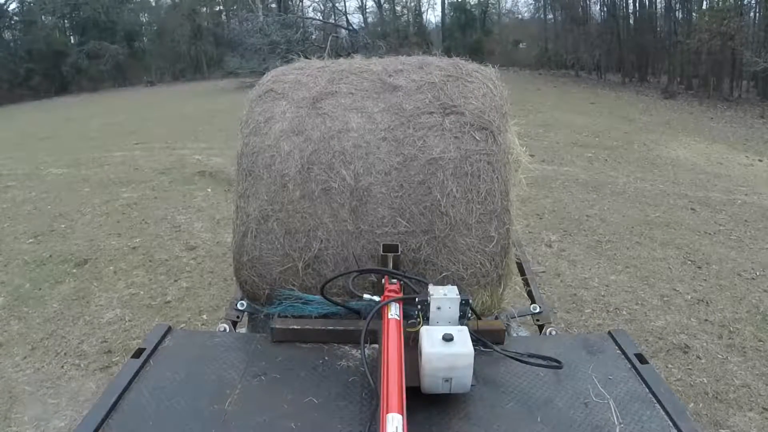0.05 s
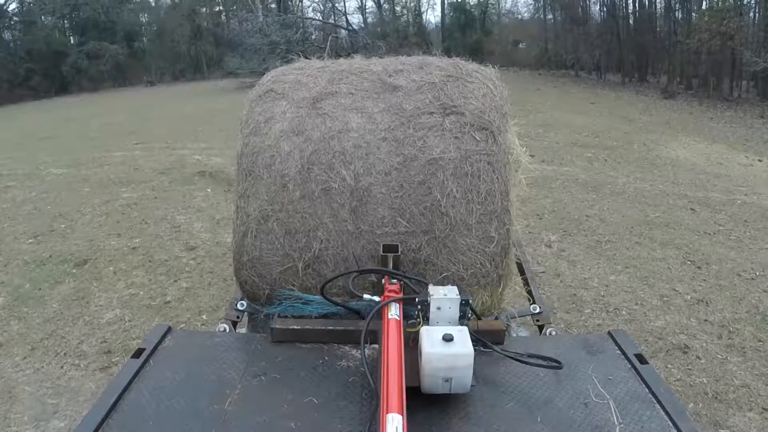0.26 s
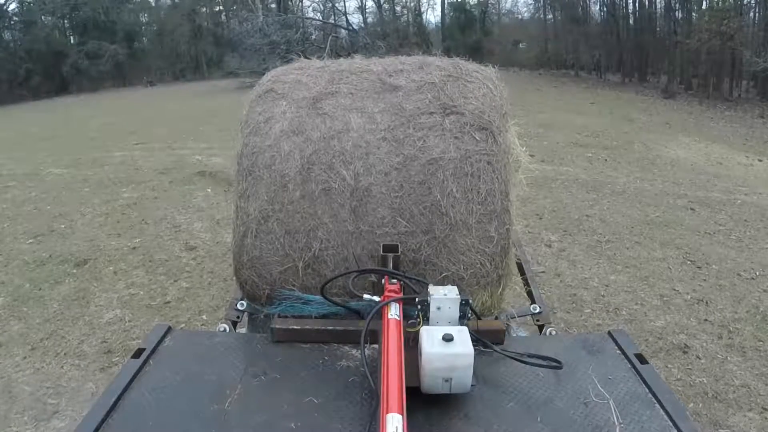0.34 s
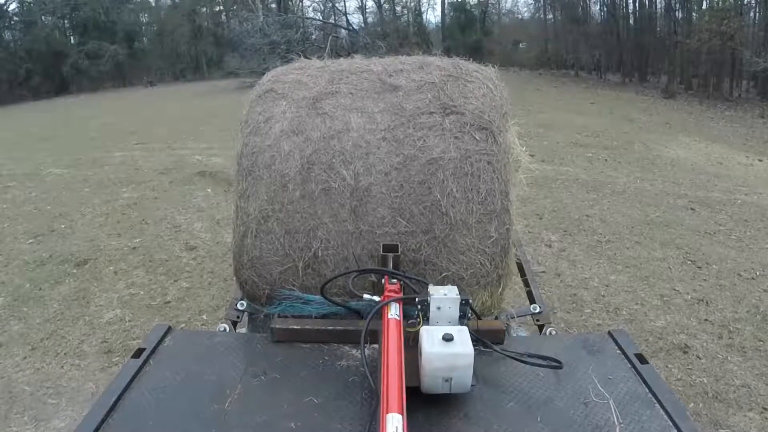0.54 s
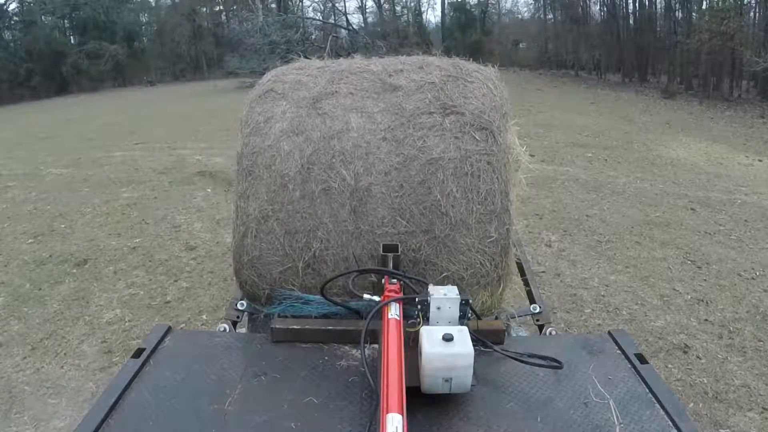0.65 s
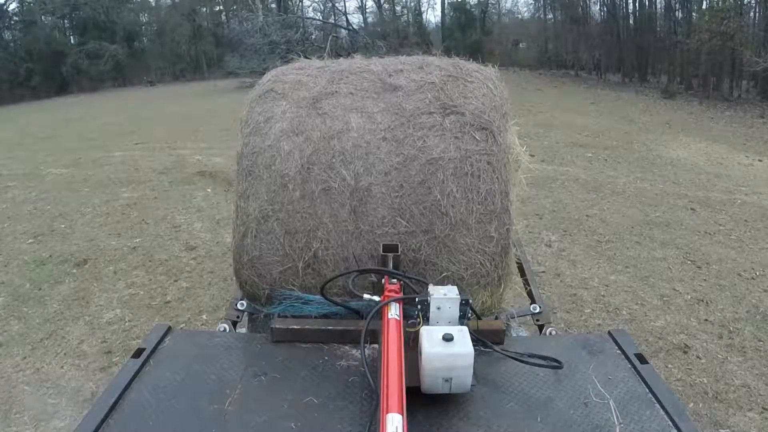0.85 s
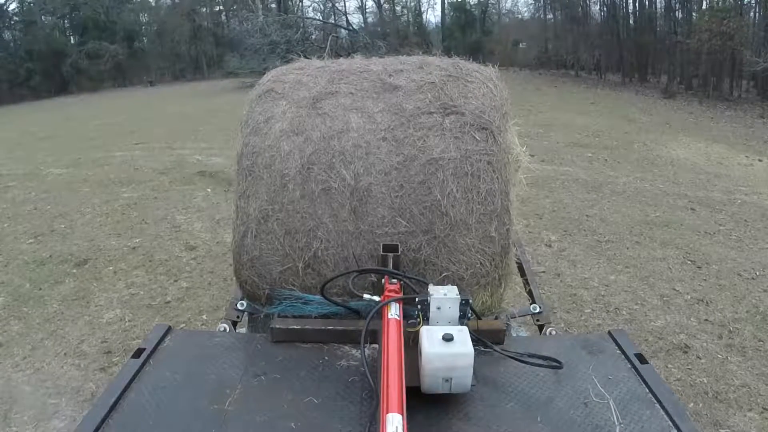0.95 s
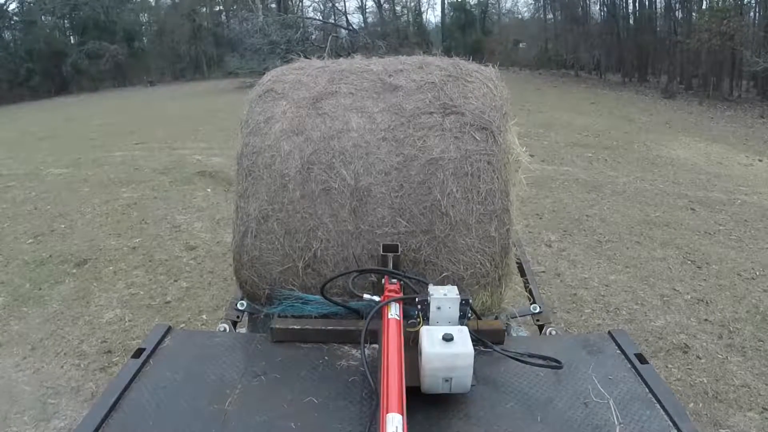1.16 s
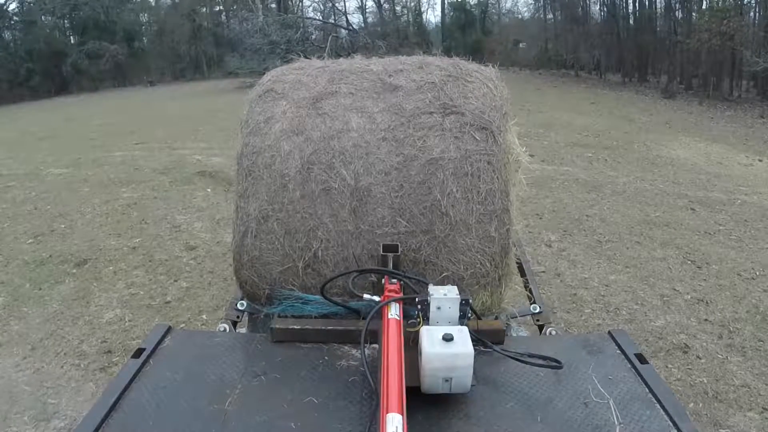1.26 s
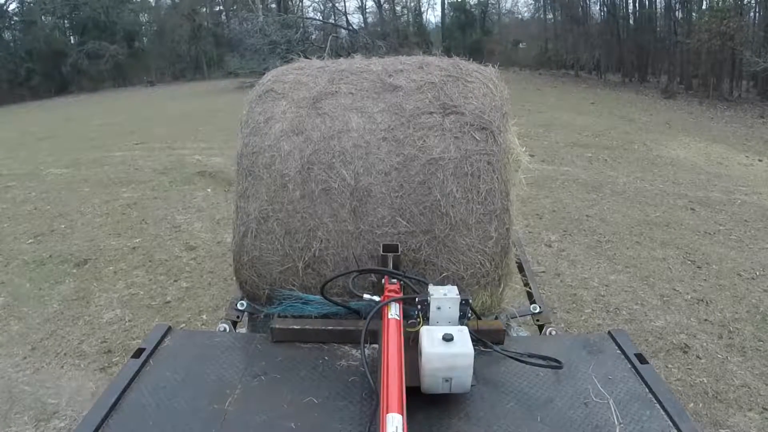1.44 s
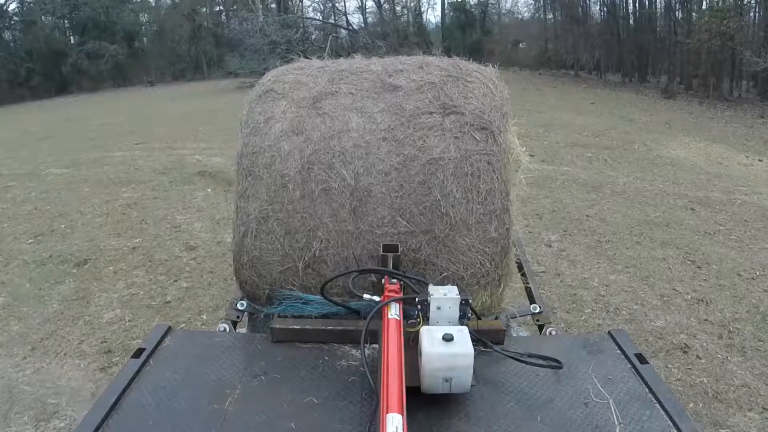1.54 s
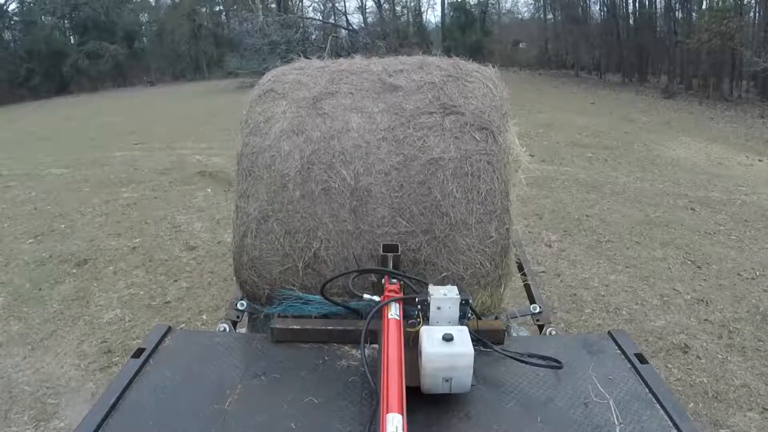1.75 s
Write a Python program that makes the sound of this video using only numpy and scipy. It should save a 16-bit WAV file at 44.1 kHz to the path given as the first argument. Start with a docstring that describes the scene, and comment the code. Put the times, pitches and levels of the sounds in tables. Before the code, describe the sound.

A steel lift clunks and rattles as a flatbed truck creeps across a field, and the deck booms under the bouncing load. Low rumble, soft hiss and faint hay crackle continue at a microphone above the bed.

```python
"""A low rumble, soft hiss and a faint high whine: a flatbed truck creeps over a field with a round hay
bale on its rear spear, heard from one microphone above the bed. Almost at once the steel lift clunks and
rattles, each contact ringing its frame. A loose part rubs and clangs softly, jolts thud in the body
panels and the deck booms as the load bounces. Dry stalks crackle faintly while the truck rolls on."""
import sys
import numpy as np
from scipy import signal
from scipy.fft import rfft, irfft, next_fast_len
from scipy.io import wavfile
from scipy.ndimage import map_coordinates

SR = 44100
rng = np.random.default_rng(int(sys.argv[2]) if len(sys.argv) > 2 else 0)


def materialize(psi):
    """Save the field psi as 16-bit PCM at rate SR to the path in sys.argv[1].

    A 1-D psi becomes a single channel; in a 2-D psi each row is a channel.
    """
    bounded = np.clip(np.atleast_2d(psi).T, -1, 1)
    quanta = np.round(bounded * 32767).astype(np.int16)
    wavfile.write(sys.argv[1], SR, quanta)


N = 79380
TIME = np.arange(N) / SR


def amp(db):
    return 10 ** (np.asarray(db) / 20)


def unit_rms(x):
    return x / np.sqrt(np.mean(x ** 2) + 1e-20)


def along(points, hz):
    """Read (Hz, value) points on a log frequency axis."""
    knots_hz, values = np.transpose(points)
    return np.interp(np.log(hz + 1), np.log(knots_hz + 1), values)


def wobble(rate):
    """A smooth random curve, rate knots a second."""
    return map_coordinates(rng.standard_normal(int(N * rate / SR) + 4), [TIME * rate])


def tone(hz, wander_rad, rate):
    """A sine of rms 1 whose phase wanders, rate knots a second."""
    return unit_rms(np.sin(2 * np.pi * hz * TIME + wander_rad * wobble(rate)))


def filtered(x, response):
    """Shape x by a gain given as a function of frequency."""
    size = next_fast_len(N + SR // 2)
    return irfft(rfft(x, size) * response(np.fft.rfftfreq(size, 1 / SR)), size)[..., :N]


def noise(spectrum):
    """Coloured noise of rms 1."""
    return unit_rms(filtered(rng.standard_normal(N), lambda hz: amp(along(spectrum, hz))))


def rise(seconds):
    """A smooth attack from 0 to 1."""
    return np.sin(np.pi / 2 * np.clip(TIME / seconds, 0, 1)) ** 2


def fade(t, t60):
    """Hold at 1 until t = 0, then fall 60 dB every t60 seconds."""
    return amp(-60 * np.maximum(t, 0) / t60)


def ring(modes, scatter_db, blur_hz):
    """One stroke on a set of modes: scatter varies their strength, loose joints blur their pitch."""
    t = TIME[:int(0.8 * SR)]
    hz, db, t60 = np.transpose(modes)[:, :, None]
    gain = amp(db + scatter_db * rng.standard_normal(db.shape))
    walk = np.cumsum(rng.standard_normal((len(modes), len(t))), axis=1)
    drift = walk * np.sqrt(2 * np.pi * blur_hz / SR)
    phase = 2 * np.pi * (hz * t + rng.random(hz.shape)) + drift
    waves = gain * fade(t, t60) * np.sin(phase)
    return np.pad(waves.sum(axis=0), (0, N - len(t)))


def add(out, start_s, x):
    first = int(start_s * SR)
    out[first:] += x[:N - first]


# Hiss all around the microphone. Each row: frequency in Hz, relative density in dB.
HISS_SPECTRUM = [(160, -31), (280, -2.5), (527, -3), (572, -2.5), (717, -5.5), (843, -2.5), (1190, -8),
                 (1330, -5), (8170, -22), (12200, -29.5), (13500, -35)]
def hiss():
    """A soft, broad hiss whose level wavers slightly."""
    return amp(-61 + 0.8 * wobble(11.6)) * noise(HISS_SPECTRUM)


# The faint whine high above the rest. Each row: frequency in Hz, level in dB.
WHINE_TONES = [(14147, -82), (14207, -86)]
# The fuzz around it. Each row: frequency in Hz, relative density in dB.
FUZZ_SPECTRUM = [(12500, -36), (13700, -12), (14180, 3), (14400, -3), (14700, -46), (15000, -94)]
def whine():
    """Two thin, close tones waver in a narrow band of noise."""
    tones = sum(amp(db) * tone(hz, wander_rad=0.73, rate=9) for hz, db in WHINE_TONES)
    return tones + amp(-89) * noise(FUZZ_SPECTRUM)


# Body resonances below the microphone, deepest first.
# Each row: frequency in Hz, base level in dB, phase wander in radians.
BODY_HUMS = [(37.63, -42.5, 0.77), (86.6, -55.5, 0.91), (204.7, -54, 1)]
# The sway of the deepest hum. Each row: time in seconds, gain in dB.
DEEP_SWAY = [(0, -15.5), (.18, -4.5), (.7, -8), (.82, 6), (.9, -6.5), (.98, 5), (1.17, 4), (1.3, -5.5),
             (1.52, 2.5), (1.63, -11.5), (1.8, 2.5)]
# The sway of the two upper hums. Each row: time in seconds, gain in dB.
UPPER_SWAY = [(0, -0.5), (.1, 1), (.16, -7.5), (.65, 2.5), (.85, 4), (1.05, -2), (1.3, -1.5), (1.6, -3.5),
              (1.8, -2)]
# The roar of rolling over the field. Each row: frequency in Hz, relative density in dB.
ROAR_SPECTRUM = [(15, -11.5), (29, 2.5), (51, 0), (65, -6), (108, -8.5), (142, -4), (222, -8), (272, -24),
                 (410, -29.5), (800, -63)]
def truck_rumble():
    """Rolling keeps the body's resonances humming over a low roar."""
    flutter_db, roar_db = 3.5, -49
    deep, *hums = [amp(db) * tone(hz, wander, rate=11) for hz, db, wander in BODY_HUMS]
    upper = sum(hum * amp(flutter_db * wobble(12.19)) for hum in hums)
    deep_gain = amp(np.interp(TIME, *np.transpose(DEEP_SWAY)))
    upper_gain = amp(np.interp(TIME, *np.transpose(UPPER_SWAY)))
    return deep_gain * deep + upper_gain * upper + amp(roar_db) * noise(ROAR_SPECTRUM)


# Dry hay, barely reaching the microphone. Each row: frequency in Hz, relative density in dB.
STALK_SPECTRUM = [(2000, -23), (5000, -8), (8000, 7.5), (11000, 1), (14000, -7)]
def hay_crackle():
    """Dry stalks give tiny random ticks that swell after the jolts and ease off."""
    peak_s, spread_s, ticks_per_s = 1.1, 0.5, 168.5
    swell = np.exp(-0.5 * ((TIME - peak_s) / spread_s) ** 2)
    ticks = (rng.random(N) < ticks_per_s / SR) * rng.random(N) * swell
    envelope = signal.fftconvolve(ticks, fade(TIME, t60=0.027))[:N]
    return amp(-69.5) * envelope * noise(STALK_SPECTRUM)


# Jolts coming up through the truck. Each row: start in seconds, gain in dB.
BODY_JOLTS = [(.209, -34.5), (.239, -38.5), (.313, -36), (.365, -38.5), (.466, -42.5), (.512, -44),
              (.628, -52), (1.146, -47.5)]
# Modes of the body panels. Each row: frequency in Hz, relative level in dB, t60 in seconds.
PANEL_MODES = [(71.4, -7, 0.16), (86.2, -0.5, 0.29), (107.2, -7, 0.42), (137.3, -4, 0.305), (163, -5, 0.35),
               (187.2, -1.5, .3), (210.3, 0, .33), (235.7, -2.5, .22), (286.3, -17.5, 0.32)]
def panel_thuds():
    """Each jolt thuds in the low modes of the body panels."""
    out = np.zeros(N)
    for start, db in BODY_JOLTS:
        add(out, start, amp(db) * rise(0.0084) * ring(PANEL_MODES, scatter_db=1, blur_hz=0))
    return out


# Booms of the deck under the microphone.
# Each row: start in seconds, level in dB, frequency in Hz, then rise, hold and t60 in seconds.
DECK_BOOMS = [(.237, -23.5, 39.1, 0.032, .068, 0.023), (.365, -31.5, 47, 0.0088, 0.046, 0.2),
              (0.409, -26.5, 37.47, 0.055, 0.027, 0.8)]
def deck_booms():
    """The bouncing load flexes the deck unevenly, adding a weak octave to each deep note."""
    out = np.zeros(N)
    for start, db, hz, rise_s, hold_s, t60 in DECK_BOOMS:
        phase = 2 * np.pi * hz * TIME
        flex = unit_rms(np.sin(phase) + amp(-16) * np.sin(2 * phase))
        envelope = rise(rise_s) * fade(TIME - rise_s - hold_s, t60)
        add(out, start, amp(db) * envelope * flex)
    return out


# Modes of a loose part on the truck. Each row: frequency in Hz, relative level in dB, t60 in seconds.
LOOSE_PART_MODES = [(868, -12.5, 0.22), (920, -5.5, 0.36), (973, -6, 0.33), (1016, -10, 0.45),
                    (1102, -11, 0.22), (1345, -22.5, 0.36), (1632, -18, .28), (2070, -19, .18),
                    (2114, -15, .16), (2316, -11, 0.14), (2442, -5.5, 0.16), (2464.4, 0.5, 0.25),
                    (2590, -11, 0.23), (2600, -19, 0.28), (3420, -19, .3)]
# Its rubbing. Each row: frequency in Hz, relative density in dB.
RUB_SPECTRUM = [(500, -20), (760, -8.5), (960, 4), (1200, -17), (1900, -13), (2460, 9.5), (2820, -15),
                (3480, -25), (4200, -29), (9000, -67)]
def loose_part_clang():
    """A loose part rubs briefly into its stop: the ring swells without a crack."""
    out = np.zeros(N)
    start_s, gain_db = 0.3755, -34.5
    rub = amp(-3.5) * noise(RUB_SPECTRUM) * fade(TIME, t60=0.28)
    ringing = ring(LOOSE_PART_MODES, scatter_db=2.5, blur_hz=5.2)
    add(out, start_s, amp(gain_db) * rise(0.013) * (ringing + rub))
    return out


# The dense ring of the lift frame. Each row: frequency in Hz, relative density in dB.
CLATTER_SPECTRUM = [(300, 4), (500, -5), (900, -1), (1600, -3), (2700, -1.5), (3300, -15.5), (5000, -18.5),
                    (8000, -23.5), (14000, -29)]
# How long it lingers. Each row: frequency in Hz, t60 in seconds.
CLATTER_DECAY = [(520, 0.38), (2100, 0.27), (3600, 0.45), (5500, 0.25), (12000, 0.089)]
def frame_clatter():
    """The frame's crowded modes merge into noise, each band dying at its own rate."""
    hz, age, bands = signal.stft(noise(CLATTER_SPECTRUM), SR, nperseg=256)
    decay = fade(age, along(CLATTER_DECAY, hz)[:, None])
    _, clatter = signal.istft(bands * decay, SR, nperseg=256)
    return clatter[:N]


# Steel meeting steel in the lift, at the rear of the bed.
# Each row: start in seconds, gain in dB, treble cutoff in Hz.
LIFT_CONTACTS = [(0.197, -51, 3400), (0.2052, -35.5, 11500), (0.2075, -38.5, 10500), (0.2136, -45, 7000),
                 (0.223, -46, 6000), (0.2255, -49, 4600), (0.2333, -54, 7200), (0.2526, -46.5, 4600),
                 (0.287, -50.5, 3600), (.318, -47.5, 3200), (0.484, -53, 2400), (.495, -43, 1700),
                 (0.512, -54, 1390), (.549, -53.5, 1560), (.594, -55, 1200)]
# The crack of a contact. Each row: frequency in Hz, relative density in dB.
CRACK_SPECTRUM = [(400, -22), (1200, -3), (2200, 3.5), (3500, -2), (5000, -9), (7000, -16), (11000, -26),
                  (15000, -42)]
# Modes of the lift frame. Each row: frequency in Hz, relative level in dB, t60 in seconds.
FRAME_MODES = [(591.2, -11.5, 0.31), (934, -6.5, 0.39), (970, -6.5, 0.47), (1173, -10.5, 0.35),
               (1330, -10, 0.62), (1418.5, -8.5, 0.32), (1550, -9.5, .24), (1655, -6, 0.23),
               (1820, -16, 0.17), (2210, -13, 0.28), (2527, -5, 0.22), (2917, -8, 0.15),
               (3920, -11.5, 0.093), (5000, -15, .04)]
def lift_clunk():
    """Each steel contact cracks and sets the frame ringing; the hardest are the brightest."""
    out = np.zeros(N)
    for start, db, cutoff_hz in LIFT_CONTACTS:
        clatter = amp(-6) * frame_clatter()
        crack = amp(1) * noise(CRACK_SPECTRUM) * fade(TIME, t60=0.014)
        ringing = amp(-7.5) * ring(FRAME_MODES, scatter_db=0, blur_hz=8.9)
        blow = filtered(clatter + crack + ringing, lambda hz: 1 / np.sqrt(1 + (hz / cutoff_hz) ** 4))
        add(out, start, amp(db) * rise(0.00073) * blow)
    return out


def scene():
    """Out in the field, everything as heard in mono from above the truck's bed."""
    background = hiss() + whine() + truck_rumble() + hay_crackle()
    knocks = panel_thuds() + deck_booms() + loose_part_clang() + lift_clunk()
    return (background + knocks)[None]


def record(dry):
    """The microphone's recorder keeps nothing above its band limit."""
    return filtered(dry, lambda hz: hz < 14800)


dry = scene()
out = record(dry)
materialize(out)
```